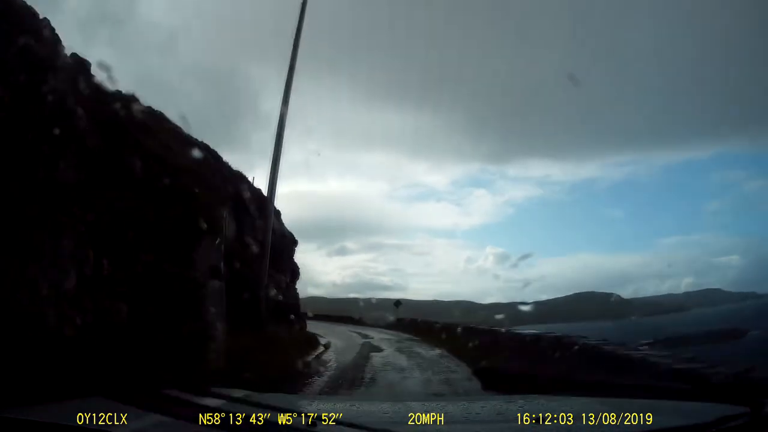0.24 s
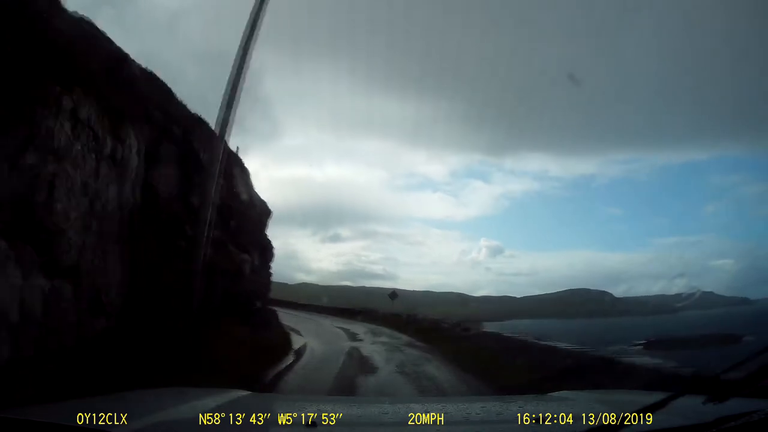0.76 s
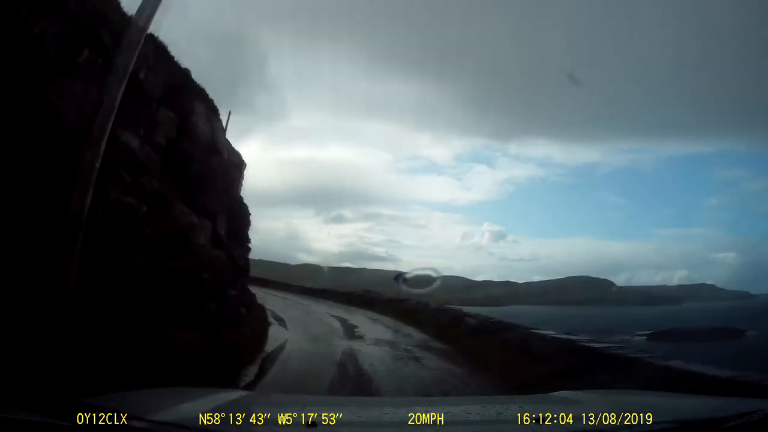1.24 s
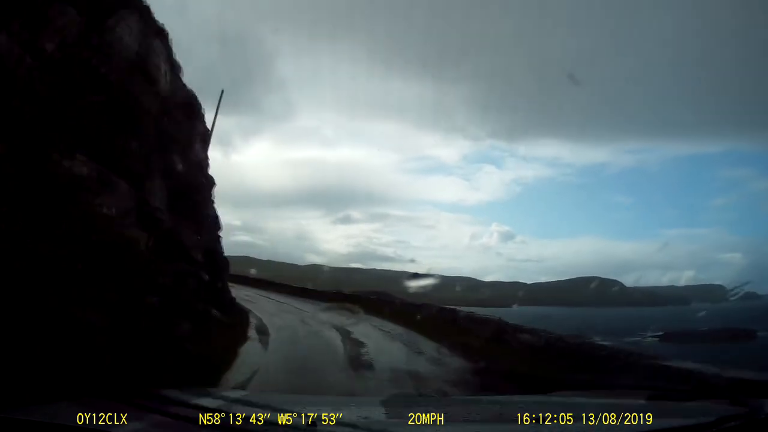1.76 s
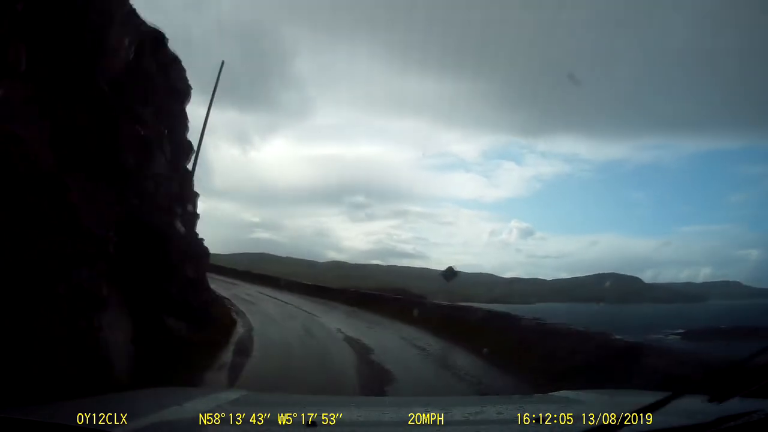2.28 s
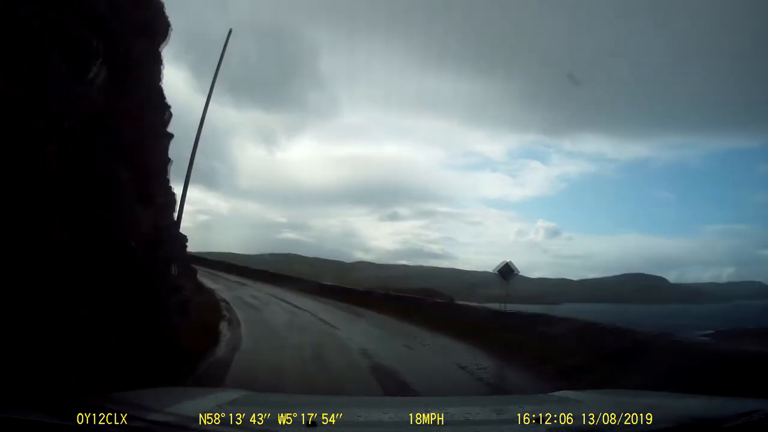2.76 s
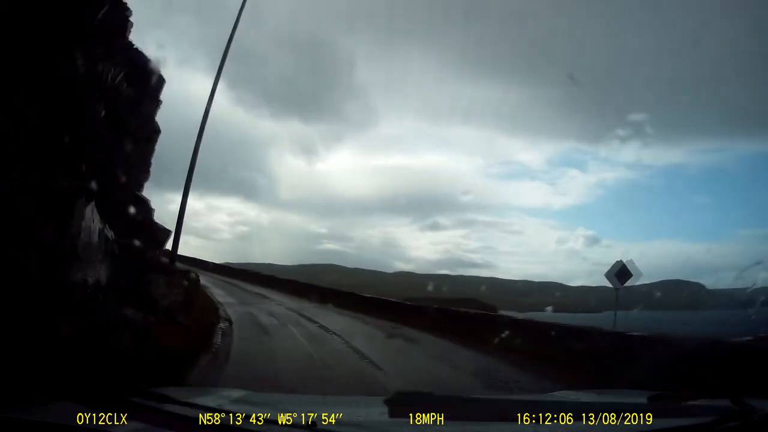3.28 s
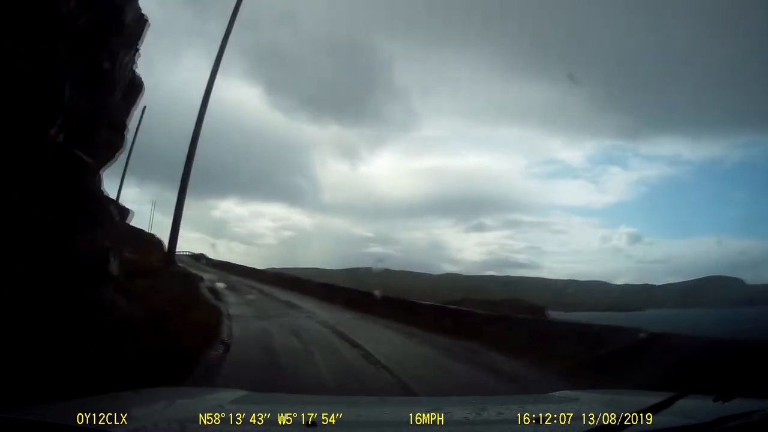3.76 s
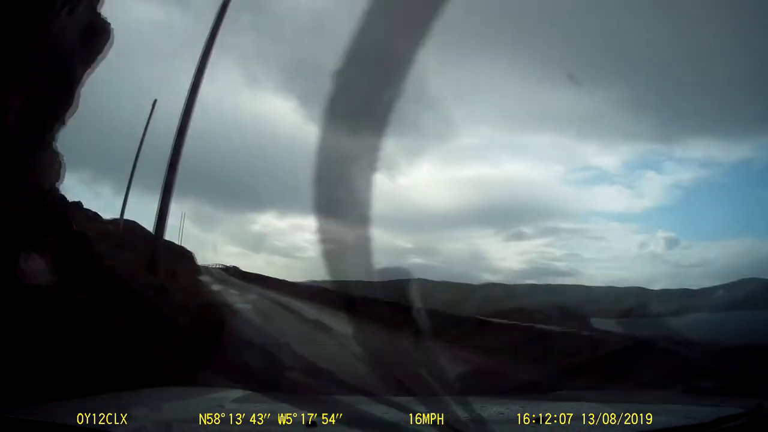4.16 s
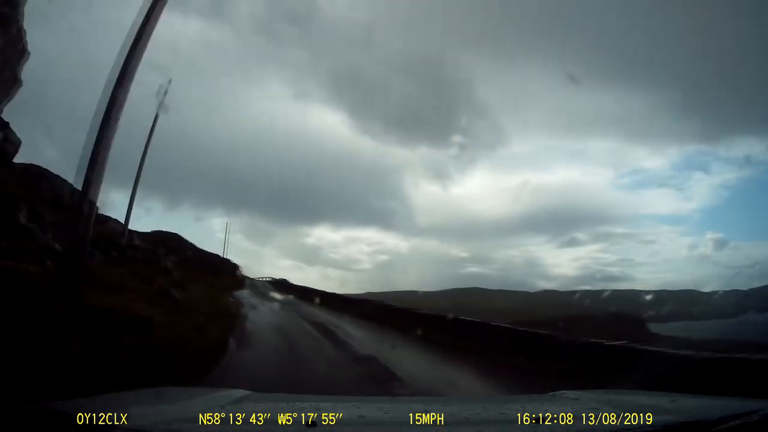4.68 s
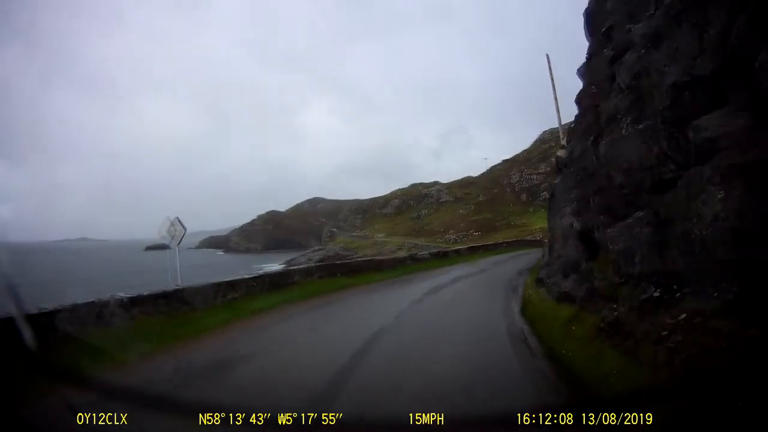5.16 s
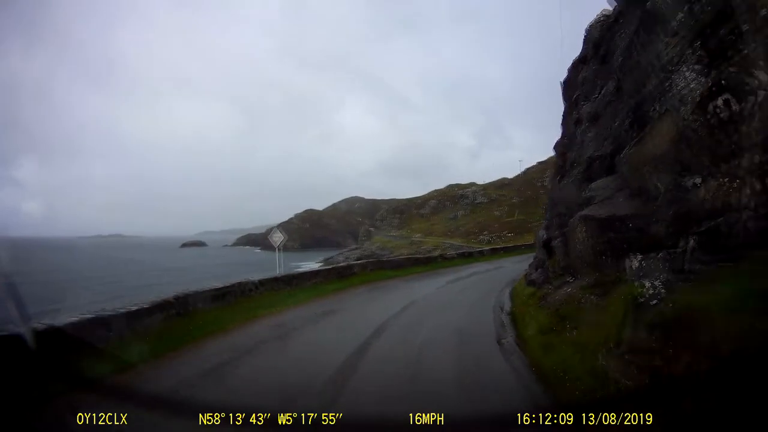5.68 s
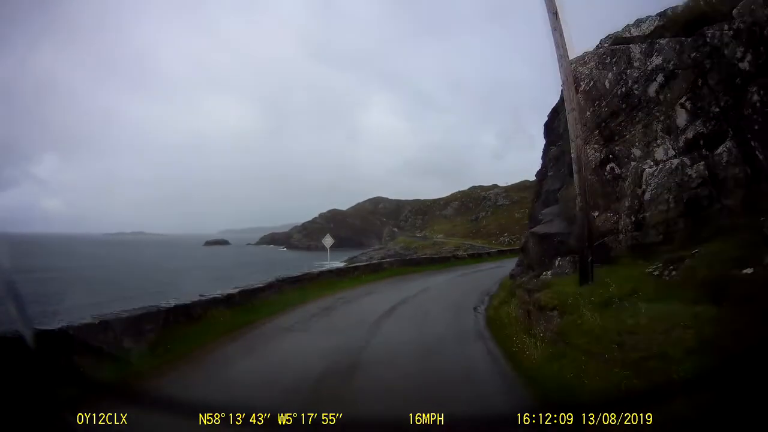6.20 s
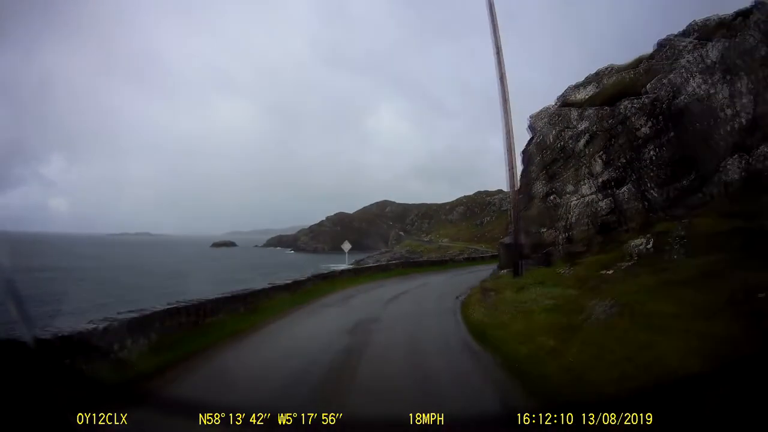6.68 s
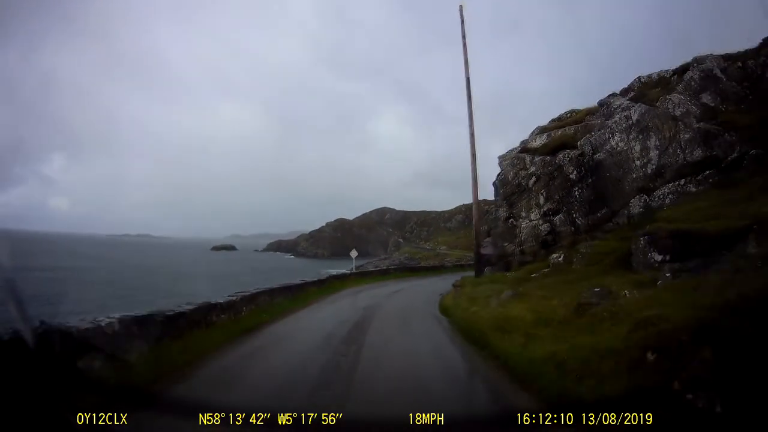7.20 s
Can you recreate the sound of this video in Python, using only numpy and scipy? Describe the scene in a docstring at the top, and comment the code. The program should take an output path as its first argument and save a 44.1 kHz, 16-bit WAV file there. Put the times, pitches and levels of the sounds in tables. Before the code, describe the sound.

Close, dry cabin sound, one channel. Low engine boom and muffled road rumble with a dull wash of water under the wheels. Raindrops tick and ping on the windscreen; rubber wiper blades scuff softly at every turn, sometimes chirping. The engine pulls a little harder near three seconds just before the rain eases for over a second, then denser drops return with louder wiper rubs and an occasional low bump.

```python
"""Inside a car driving slowly along a wet road in a shower, heard from just behind the windscreen.
The engine booms at low revs, as a sine at its firing rate with growling orders; tyres rumble as filtered noise.
The wipers sweep to and fro: at each turn noise bursts scuff, short gliding tones chirp and the blades flop over.
Raindrops tick on the glass as impacts with a ringing tail, thinning out for a while in the lee of a rock face.
Bumps boom and puddles swish under the car; the resonances of the small cabin colour it all."""
import sys
import numpy as np
from scipy import signal
from scipy.fft import rfft, irfft
from scipy.io import wavfile

SR = 44100
rng = np.random.default_rng(int(sys.argv[2]) if len(sys.argv) > 2 else 0)


def persist_wave(psi):
    """Save psi, clipped to +-1, as 16-bit WAV."""
    counts = np.round(np.clip(psi, -1, 1) * 32767).astype(np.int16)
    wavfile.write(sys.argv[1], SR, np.atleast_2d(counts).T)


N = 328104  # length in samples

# Engine firing rate in one gear, so it also gives the road speed: time_s, rate_hz
FIRING_RATE = [(0, 40), (.3, 36.76), (1.7, 36.79), (2.4, 35.24), (2.9, 35.35), (3.9, 38.57), (4.7, 39),
               (6.5, 43.47), (7.44, 42.97)]
# Boom under engine load; the throttle opens just before 3 s and is slowly eased: time_s, level_db
ENGINE_BOOM = [(0, -36.5), (.2, -45), (.7, -48), (1.6, -43), (2.35, -45), (2.65, -77), (2.8, -45),
               (2.95, -34.5), (3.8, -37), (4.8, -36.5), (5.6, -45), (6.2, -44.5), (7.2, -52), (7.44, -35.5)]
# The upper engine orders swell and sink: time_s, level_db
ENGINE_GROWL = [(0, -55.5), (1.0, -68), (1.4, -50), (3.1, -56), (3.8, -64), (4.65, -45), (5.1, -59.5),
                (6.5, -51), (7.44, -45)]
# Engine orders above the firing rate: multiple, level_db (relative to the growl)
UPPER_ORDERS = [(2, 0.5), (3, -6.5), (4, -10)]
CRUISE_HZ = 37  # firing rate at cruise

# Rumble from the roughness of the road: time_s, level_db
ROAD_RUMBLE = [(0, -45.5), (.3, -45), (.6, -40.5), (1.9, -44.5), (2.6, -46), (3.1, -44), (3.8, -45),
               (4.6, -43), (5.8, -38.5), (7.44, -43)]
# Bumps that set the body booming: centre_s, level_db, half_length_s, pitch_hz
BODY_BUMPS = [(0.588, -34, 0.0062, 80.6), (2.436, -39.5, 0.025, 68), (4.682, -39, 0.071, 73.4),
              (6.109, -34, 0.019, 39.5), (7.044, -35.5, .025, 85.4)]
# Water thrown up from puddles: centre_s, level_db, half_length_s
PUDDLE_SPLASHES = [(1.492, -59, 0.011), (5.663, -61.5, 0.024), (5.884, -64, 0.018), (6.166, -61.5, 0.0071),
                   (6.94, -58, 0.0074)]
# Water under the wheels: level at cruise in the open, rise per doubling of speed
WASH_DB, WASH_DB_PER_OCTAVE = -53, 10
WASH_FOLLOWS = 0.62  # share of the shower's swing in dB

# Blades scuff as they stop and again as they set off, turning about every 0.77 s:
# peak_s, rub_db, wet_swish_db (both before the judder), rise_s, decay_s
WIPER_SCUFFS = [(.568, -37.5, -45.5, 0.0037, 0.016), (.686, -44, -59, 0.022, 0.015),
                (1.355, -45, -56.5, .028, 0.048), (1.445, -39, -53.5, .03, 0.037),
                (2.098, -39.5, -52.5, 0.0071, 0.044), (2.216, -40, -58, 0.019, .024),
                (2.87, -40, -62, 0.033, .041), (2.978, -43, -71, 0.025, 0.064),
                (3.65, -52.5, -79, .028, 0.021), (3.75, -53, -80, 0.047, .025),
                (4.42, -45, -69, 0.031, 0.069), (4.515, -44.5, -62, 0.02, 0.061),
                (5.179, -38.5, -48, 0.011, 0.011), (5.214, -34.5, -48.5, 0.0087, 0.02),
                (5.286, -36.5, -46, .005, 0.019), (5.969, -39, -45.5, 0.017, .016),
                (6.059, -37.5, -45, 0.0055, 0.0085), (6.086, -39, -55.5, .016, 0.021),
                (6.725, -40, -52, .016, 0.024), (6.767, -38, -48, .009, 0.0052),
                (6.845, -41.5, -60, 0.024, 0.027)]
# Blades flopping over: centre_s, grunt_db, half_length_s, grunt_hz, arm_knock_db (click before its filter)
BLADE_FLOPS = [(0.6923, -47, 0.0038, 330, -1), (1.436, -48.5, 0.0069, 330, -29),
               (2.223, -37.5, 0.0066, 398, -8), (4.441, -48.5, 0.031, 237, -28),
               (5.3, -46, 0.0068, 280, -8), (6.854, -47, .016, 408, -25)]
# Rubber catching: centre_s, level_db, half_length_s, pitch_hz, pitch_fall (a share; negative rises)
RUBBER_SQUEAKS = [(.533, -63, 0.0027, 2880, .03), (.542, -60, 0.0036, 2480, 0.098),
                  (.573, -62, 0.0026, 2960, .03), (1.321, -57, .0022, 2590, 0.24),
                  (1.34, -57, 0.0031, 2500, -0.027), (1.364, -55, 0.0028, 2710, -0.16),
                  (2.068, -59, 0.0052, 2600, 0.071), (2.097, -62, .003, 2920, 0.015),
                  (2.104, -53, 0.0081, 1240, -0.078), (3.617, -74, 0.011, 2780, 0.0081),
                  (5.149, -58, .0052, 2753, 0.15), (5.179, -61.5, 0.0042, 3020, -.05),
                  (5.286, -55, 0.0028, 1500, -0.38), (6.056, -60, 0.0034, 1880, 0.18),
                  (6.695, -65, .0022, 2870, -0.013), (6.703, -56, 0.0026, 2560, -0.0027),
                  (6.72, -52.5, 0.0035, 2880, -.08)]

# Strength of the shower, dropping in the lee of the rock and building up again: time_s, level_db
SHOWER_STRENGTH = [(0, -63), (.8, -65), (2.1, -63), (2.35, -63.5), (2.68, -62), (3.08, -62), (3.25, -73),
                   (3.5, -75.5), (4.0, -73.5), (4.32, -67), (4.6, -69.5), (4.85, -69.5), (5.04, -63),
                   (5.8, -62.5), (6.09, -65), (6.13, -69.5), (6.2, -64), (6.42, -60.5), (6.6, -63.5),
                   (6.76, -61), (7.44, -63.5)]
# Fattest drops on the glass: start_s, level_db (before the part offsets in big_drops), pitch_hz (of the ping)
FAT_DROPS = [(.0644, -58, 2500), (.1268, -54, 3100), (.1956, -48, 3770), (.4265, -55, 7100),
             (.564, -60.5, 1600), (.7695, -66, 3000), (.7836, -53, 2470), (.8823, -56, 2700),
             (1.094, -67, 3050), (1.1878, -48.5, 3750), (1.2551, -58, 3500), (1.3936, -47, 6840),
             (1.6168, -58, 4800), (1.677, -53, 3000), (1.7384, -53, 3017), (1.8512, -56, 2600),
             (1.9749, -54, 3400), (2.2202, -51, 3084), (2.6175, -52.5, 3100), (2.6696, -54, 2500),
             (2.6912, -53, 4300), (2.7144, -54.5, 7000), (2.8879, -48.5, 6000), (2.9192, -49.5, 3200),
             (2.9575, -51, 3100), (3.0012, -58, 7300), (3.0547, -54, 3000), (3.0864, -58, 2740),
             (3.1849, -63, 2600), (3.2145, -63, 3100), (3.6676, -55, 3800), (3.8291, -61, 3300),
             (3.9495, -68, 2526), (4.0164, -60.5, 4970), (4.1493, -49.5, 4000), (4.2165, -63, 7090),
             (4.2841, -58, 3300), (4.3748, -59, 2700), (4.6375, -66, 5200), (4.7221, -58, 4734),
             (4.7507, -59, 4430), (4.9396, -57, 2500), (4.9628, -54, 4880), (4.9838, -52, 4730),
             (5.1069, -50.5, 3100), (5.1698, -52, 2716), (5.2415, -52.5, 3100), (5.3302, -48.5, 3400),
             (5.354, -51, 2900), (5.6397, -49.5, 5900), (5.7774, -52, 3590), (6.0007, -51, 2800),
             (6.0296, -58, 2790), (6.2283, -54.5, 2890), (6.2998, -53.5, 3100), (6.3348, -46.5, 3900),
             (6.3484, -51, 7300), (6.4235, -49.5, 7100), (6.4586, -55.5, 2497), (6.5258, -43.5, 5500),
             (7.0254, -57, 3910), (7.0734, -64, 2830), (7.0875, -43, 5600)]
OPEN_SHOWER_DB, PATTER_DB = -63, -61.5  # shower reference and patter level, both in the open
# Lesser fat drops at random: rate and level in the open, spread of level
STRAY_PER_S, STRAY_DB, STRAY_SPREAD_DB = 11, -59, 1.5
STRAY_FOLLOWS = 0.9  # share of the shower's swing in dB
DROP_HZ = 3300  # pitch of a typical drop

# Filter curves for noise and impacts, each: frequency_hz, gain_db
RUMBLE_SPECTRUM = [(16, -18.5), (25, -4), (34, -5), (46, 4.5), (58, -4.5), (70, 1), (90, -2), (130, -4),
                   (165, -15.5), (230, -21), (400, -55.5)]
WASH_SPECTRUM = [(100, -19), (180, 5.5), (280, 2), (330, 1.5), (430, 1), (540, -0.5), (680, -7.5),
                 (830, -13), (1000, -16.5), (1500, -18), (2800, -45), (6000, -60.5), (13000, -68.5)]
SCUFF_SPECTRUM = [(80, -16.5), (200, 10.5), (450, 5), (700, 0), (950, -22.5), (1400, -29), (2500, -28),
                  (5000, -38.5)]
SWISH_SPECTRUM = [(500, -23.5), (900, 9), (1400, 8.5), (2000, -2), (3000, -6), (5000, -25.5), (12000, -37)]
RASP_SPECTRUM = [(1500, -4), (2600, 12), (3100, 12), (3600, 2), (4400, 4), (6000, -16), (9000, -9),
                 (13000, -26)]
KNOCK_SPECTRUM = [(100, -5), (220, 14.5), (450, 1), (700, -10), (1000, -23), (1600, -36), (3000, -40)]
TICK_SPECTRUM = [(800, -17.5), (2500, -3), (4500, 2.5), (7000, -3.5), (12000, -13), (15500, -37)]
PANE_SPECTRUM = [(300, 2), (800, 2.5), (1500, -0.5), (3000, -1), (4500, -11), (8000, -20.5), (13000, -45)]
GLASS_SPECTRUM = [(250, -8), (600, 6), (850, 8.5), (1050, 6.5), (1600, 2.5), (2200, 0), (2850, -0.3),
                  (3700, -8), (5000, -13.5), (8000, -21.5), (12500, -28.5), (14500, -53.5)]
# Standing waves of the cabin, peaks and notches:
# frequency_hz, width_hz (before cabin() scales it by gain), gain_db
CABIN_RESONANCES = [(26.56, 6.8, 10.5), (182, 13, -7), (201.3, 10, 1.5), (246, 30, -2.5), (328, 22, -2.5),
                    (535, 110, 1.5), (602, 50, -3.5), (818, 53, 5.5), (1093, 48, -2)]
CEILING_DB, CUTOFF_HZ = -26, 15500  # where peaks round off, and the top of the band


def engine(unevenness_db=2.5, waver=0.012):
    """The firing rate booms in the cabin under load; its upper orders growl unevenly."""
    rate_hz = in_time(FIRING_RATE) * (1 + waver * drift(4.0))
    phase = 2 * np.pi * np.cumsum(rate_hz) / SR
    boom = from_db(in_time(ENGINE_BOOM) - 1.0 + 1.0 * drift(3.0)) * np.sin(phase)
    growl = np.zeros(N)
    for multiple, db in UPPER_ORDERS:
        level = from_db(db + unevenness_db * drift(4.8))
        phase_offset = rng.uniform(0, 2 * np.pi) + 0.83 * drift(5.05)
        growl += level * np.sin(round(multiple) * phase + phase_offset)
    return np.sqrt(2) * (boom + from_db(in_time(ENGINE_GROWL)) * growl)


def speed_octaves():
    """Revs and road speed, in doublings above cruise."""
    return np.log2(in_time(FIRING_RATE) / CRUISE_HZ)


def tyres(roughness_db=1.5, slosh_db=1.4):
    """Rumble through the body, and the dull wash of water under the wheels, growing with speed and rain."""
    rumble = from_db(in_time(ROAD_RUMBLE) + roughness_db * drift(39)) * noise(RUMBLE_SPECTRUM)
    wash_db = WASH_DB + WASH_DB_PER_OCTAVE * speed_octaves() + WASH_FOLLOWS * shower_db()
    wash = from_db(wash_db + slosh_db * drift(12.0)) * noise(WASH_SPECTRUM)
    return rumble + wash


def bumps():
    """Each bump swells and dies as one low note of the body."""
    boom = np.zeros(N)
    for s, db, half_length, hz in BODY_BUMPS:
        tone = np.sin(2 * np.pi * hz * (seconds() - s))
        boom += from_db(db) * swell(s, half_length) * tone
    return np.sqrt(2) * boom


def puddles(slosh_db=5.0):
    """Thrown-up water makes short wet swishes under the car."""
    level = sum(from_db(db) * swell(s, half_length) for s, db, half_length in PUDDLE_SPLASHES)
    return level * from_db(slosh_db * drift(80)) * noise(SWISH_SPECTRUM)


def wipers():
    """Scuffs spread through the pane and trail off in the cabin; flops and squeaks stay short and dry."""
    pane_and_cabin = splash(ring_s=0.009, ring_db=-7.0, cabin_s=0.023, cabin_db=-8.0)
    return signal.oaconvolve(scuffs(), pane_and_cabin)[:N] + flops() + chirps()


def scuffs(judder_db=2.1, judder_hz=110):
    """Rubber judders over the glass, pushing a bead of water ahead; each scuff swells and trails off."""
    rub, water = np.zeros((2, N))
    for s, rub_db, wet_db, rise, decay in WIPER_SCUFFS:
        time_constant = np.where(seconds() < s, rise, decay)
        drag = np.exp(-np.minimum(np.abs(seconds() - s) / time_constant, 50))
        rub += from_db(rub_db) * drag
        water += from_db(wet_db) * drag
    stutter = from_db(judder_db * drift(judder_hz) - 6.0)
    return stutter * (rub * noise(SCUFF_SPECTRUM) + water * noise(SWISH_SPECTRUM))


def flops(wobble=0.25):
    """The blade folds over with a low grunt and its arm knocks on the glass."""
    slip = wobble * drift(180)
    grunts, knocks = np.zeros((2, N))
    for s, db, half_length, hz, knock_db in BLADE_FLOPS:
        grunts += rubber_tone(s, db, half_length, hz, slip, fall=0.14)
        knocks[int(s * SR)] = from_db(knock_db)
    return grunts + coloured(knocks, KNOCK_SPECTRUM)


def chirps(wobble=0.057, rasp_db=-10.5, overtone=1.58, overtone_db=-17):
    """Each squeak glides as the blade bends, with a weak higher mode of the rubber and a rasp round it."""
    slip = wobble * drift(420)
    squeaks, rasp = np.zeros((2, N))
    for s, db, half_length, hz, fall in RUBBER_SQUEAKS:
        squeaks += rubber_tone(s, db, half_length, hz, slip, fall)
        squeaks += rubber_tone(s, db + overtone_db, half_length, overtone * hz, slip, fall)
        rasp += from_db(db + rasp_db) * swell(s, 2 * half_length)
    return squeaks + rasp * noise(RASP_SPECTRUM)


def rubber_tone(s, db, half_length, hz, wobble, fall):
    """A brief stick-slip tone whose pitch wobbles and glides as the blade bends."""
    glide = 1 - fall * np.tanh((seconds() - s) / (2 * half_length))
    phase = 2 * np.pi * np.cumsum(hz * (glide + wobble)) / SR
    return np.sqrt(2) * from_db(db) * swell(s, half_length) * np.sin(phase - phase[int(s * SR)])


def big_drops(tick_db=10.0, ping_db=0.0, ping_cycles=1.4, pane_db=19.5, pane_db_per_octave=-6.5):
    """Fat drops tick, ping for a cycle or two and ring the pane; the lower the pitch, the more body."""
    ticks, pings, pane = np.zeros((3, N + SR))
    for s, db, hz in list(FAT_DROPS) + stray_drops():
        tick = splash(ring_s=0.0017, ring_db=-6.5, cabin_s=0.0025, cabin_db=-5.5)
        ring = splash(ring_s=0.0054, ring_db=8.0, cabin_s=0.0047, cabin_db=1)
        start = int(s * SR)
        at = slice(start, start + len(tick))
        cycles = hz * np.arange(len(tick)) / SR
        ping = np.exp(-cycles / ping_cycles) * np.sin(2 * np.pi * cycles)
        body_db = pane_db + pane_db_per_octave * np.log2(hz / DROP_HZ)
        ticks[at] += from_db(db + tick_db) * tick
        pings[at] += from_db(db + ping_db) * ping
        pane[at] += from_db(db + body_db) * ring
    return pings[:N] + coloured(ticks, TICK_SPECTRUM) + coloured(pane, PANE_SPECTRUM)


def stray_drops(spread_octaves=0.38):
    """Random fat drops, fewer and softer in the lee: rows of start_s, level_db, pitch_hz."""
    rain_db = STRAY_FOLLOWS * shower_db()
    lands = rng.random(N) < STRAY_PER_S * from_db(rain_db) / SR
    level_db = STRAY_DB + rain_db + STRAY_SPREAD_DB * rng.standard_normal(N)
    hz = DROP_HZ * 2 ** (spread_octaves * rng.standard_normal(N))
    return list(zip(seconds()[lands], level_db[lands], hz[lands]))


def patter(per_s=950, size_spread_db=7.0, mist_db=-9, clumping_db=2.5, crowding=.6, count=12):
    """Small drops land in loose clumps all over the glass; a heavier shower brings more of them."""
    level = from_db(PATTER_DB + shower_db())
    heaviness = (level / level.mean()) ** crowding
    lands = rng.random(N) < per_s * heaviness * from_db(clumping_db * drift(14)) / SR
    sizes = from_db(size_spread_db * np.minimum(rng.standard_normal(N), 2.0))
    spot = rng.integers(0, count, N)
    drops = np.zeros(N)
    for k, brightness in enumerate(np.linspace(-1, 1, count)):
        hits = lands * sizes * (spot == k)
        drops += signal.oaconvolve(hits, glass_spot(brightness))[:N]
    # the finest spray merges into a hiss
    impacts = rms_one(drops / np.sqrt(heaviness)) + from_db(mist_db) * rng.standard_normal(N)
    return level * rms_one(coloured(impacts, GLASS_SPECTRUM))


def glass_spot(brightness, tilt_db=3.0, ring_s=0.0055):
    """One spot on the glass: near ones (brightness 1) tick sharply, far ones (-1) tap dully and ring longer."""
    spot_ring_s = ring_s * 2.0 ** -brightness
    hit = splash(ring_s=spot_ring_s, ring_db=-3 * brightness, cabin_s=0.0028, cabin_db=-1.0)
    bass = signal.sosfilt(signal.butter(1, 3000, fs=SR, output="sos"), hit)
    treble = hit - bass
    return (bass + from_db(tilt_db * brightness) * treble) / np.linalg.norm(bass)


def shower_db():
    """Strength of the rain relative to the open road."""
    return in_time(SHOWER_STRENGTH) - OPEN_SHOWER_DB


def splash(ring_s, ring_db, cabin_s, cabin_db, size=3000):
    """One impact: a sharp tick, a short dense ring of the pane, and cabin reflections."""
    t = np.arange(size) / SR
    out = np.zeros(size)
    out[0] = 1
    for decay_s, db in [(ring_s, ring_db), (cabin_s, cabin_db)]:
        tail = rng.standard_normal(size) * np.exp(-t / decay_s)
        out += from_db(db) * tail / np.linalg.norm(tail)
    return out


def cabin(x):
    """The small closed space lifts some pitches and swallows others, one resonance after another."""
    for hz, width_hz, db in CABIN_RESONANCES:
        sharpness = hz / width_hz * from_db(db / 2)
        b, a = signal.iirpeak(hz, sharpness, fs=SR)
        x = x + (from_db(db) - 1) * signal.lfilter(b, a, x)
    return x


def from_db(db):
    """Decibels to gain."""
    return 10 ** (np.asarray(db) / 20)


def rms_one(x):
    """Scale to unit rms."""
    return x / np.sqrt(np.mean(x ** 2) + 1e-20)


def seconds():
    """The time of every sample."""
    return np.arange(N) / SR


def in_time(rows):
    """A control curve, joined by straight lines."""
    return np.interp(seconds(), *np.transpose(rows))


def swell(s, half_length):
    """A bell-shaped rise and fall round time s."""
    return np.exp(-.5 * np.minimum(((seconds() - s) / half_length) ** 2, 100))


def drift(rate_hz, step=40):
    """Random wandering of rms 1: low-passed noise computed every 40 samples and joined by lines."""
    r = np.exp(-2 * np.pi * rate_hz * step / SR)
    raw = rng.standard_normal(N // step + 2002)
    slow = signal.lfilter([1], [1, -2 * r, r * r], raw)[2000:]  # skip the filter's run-in
    return np.interp(np.arange(N) / step, np.arange(len(slow)), rms_one(slow))


def coloured(x, spectrum, size=8192):
    """Causal (minimum-phase) filter that follows a spectrum: nothing sounds before its cause."""
    hz, db = np.transpose(spectrum)
    grid = np.maximum(np.fft.rfftfreq(size, 1 / SR), 1)
    octaves_outside = np.maximum(np.log2(hz[0] / grid), 0) + np.maximum(np.log2(grid / hz[-1]), 0)
    # beyond the curve's ends: 18 dB down per octave, for two octaves
    gain_db = np.interp(np.log(grid), np.log(hz), db) - 18 * np.minimum(octaves_outside, 2)
    # folding the cepstrum onto positive times gives minimum phase
    cepstrum = irfft(np.log(from_db(gain_db)))
    cepstrum[1:size // 2] *= 2
    cepstrum[size // 2 + 1:] = 0
    impulse_response = irfft(np.exp(rfft(cepstrum)))
    return signal.fftconvolve(x, impulse_response)[:N]


def noise(spectrum):
    """Coloured noise of rms 1."""
    return rms_one(coloured(rng.standard_normal(N), spectrum))


def scene():
    """Everything as heard just behind the windscreen, in one channel."""
    road = engine() + tyres() + bumps() + puddles()
    windscreen = wipers() + big_drops() + patter()
    return cabin(road + windscreen)[None]


def record(dry):
    """The highest peaks are rounded off and the top is cut steeply."""
    rounded = dry / (1 + (dry / from_db(CEILING_DB)) ** 8) ** (1 / 8)
    return signal.sosfilt(signal.cheby1(10, .2, CUTOFF_HZ, fs=SR, output="sos"), rounded)


dry = scene()
out = record(dry)
persist_wave(out)
```